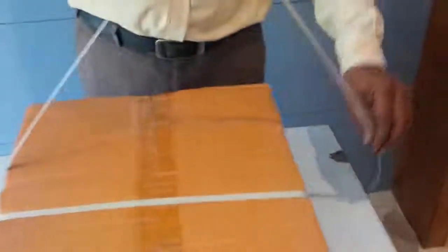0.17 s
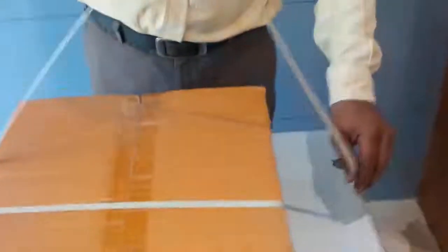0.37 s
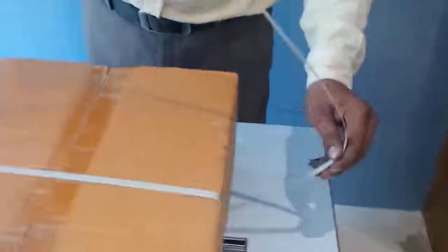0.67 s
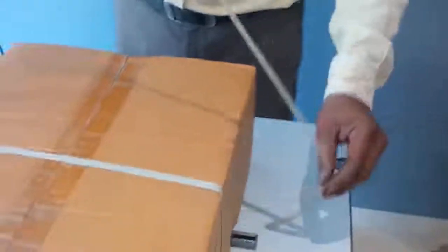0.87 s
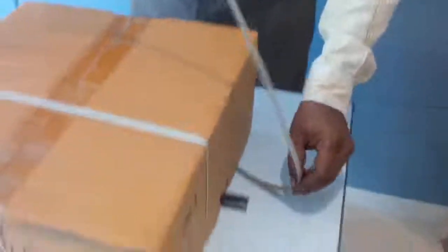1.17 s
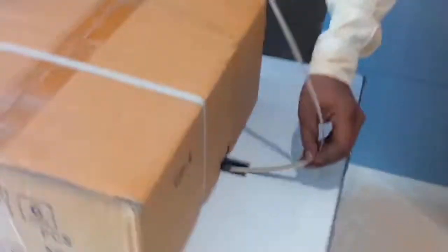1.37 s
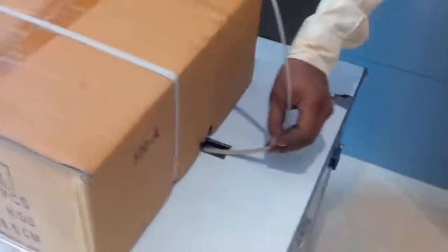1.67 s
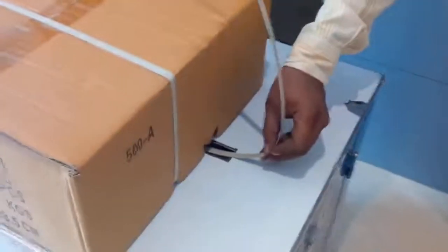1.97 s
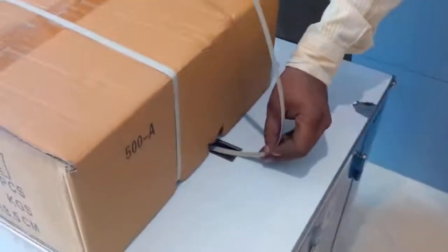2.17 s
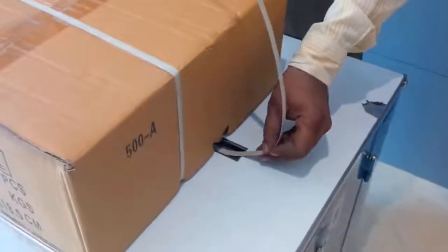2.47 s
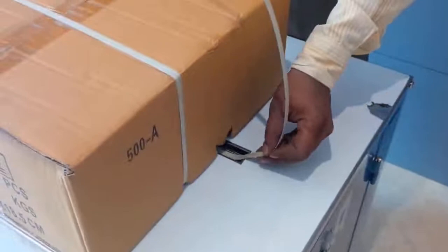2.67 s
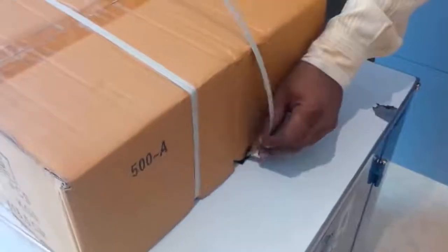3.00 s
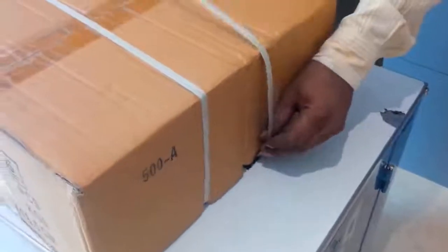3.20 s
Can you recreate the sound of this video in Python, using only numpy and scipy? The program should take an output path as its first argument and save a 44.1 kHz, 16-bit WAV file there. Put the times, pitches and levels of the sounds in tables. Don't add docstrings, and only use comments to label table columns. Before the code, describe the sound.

A strapping machine hums low and steady, with a wavering mains buzz. At 0.74 s a metallic click and cabinet thud start light gear clatter, with a faint tick near 1.05. From 1.65 to 2.1 s come dense clanks, carton knocks and strap rustle. Softer knocks follow at 2.3 and 2.7. The loudest clanks, thud and strap slaps hit at 2.95-3.2 s, clatter continuing to the end; hard-room echo.

```python
import sys
import numpy as np
from scipy import signal
from scipy.fft import rfft, irfft, next_fast_len
from scipy.io import wavfile
from scipy.ndimage import uniform_filter1d

SR = 44100
rng = np.random.default_rng(int(sys.argv[2]) if len(sys.argv) > 2 else 0)


def volts_from_db(level):
    exponent = np.asarray(level, float) / 20
    return 10 ** exponent


def pcm_store(signal):
    levels = np.round(np.clip(np.atleast_2d(signal), -1, 1) * 32767)
    wavfile.write(sys.argv[1], SR, levels.astype(np.int16).T)


N = 147294

# [f/Hz, level/dB]
MOTOR_COLOUR = [(20, -23), (70, -3.5), (140, -5.5), (400, -5.5), (520, -10), (2500, -24.5), (6100, -36),
                (9800, -64), (13000, -67)]
# [f/Hz, width/Hz, level/dB]
CABINET_DRONE = [(52.8, 2.7, -13), (103.5, 25, -12.5), (143.25, 4.1, -3), (174, 18, -19), (266.7, 48, -8),
                 (301, 68, -14.5), (404.5, 47, -14.5)]
# [t/s, level/dB]
PANEL_SHAKE = [(0, -33.5), (.69, -33.5), (.88, -22), (1.01, -33.5), (1.18, -37), (1.53, -38.5),
               (1.79, -22.5), (2.2, -60), (2.35, -33), (2.68, -24), (2.78, -35), (3.11, -30), (3.34, -29)]
# [t/s, level/dB]
MAINS_BUZZ = [(0, -29), (.3, -30), (.6, -30.5), (.9, -29), (1.35, -26), (1.5, -36), (1.63, -23.5),
              (1.8, -27), (2.1, -35), (2.5, -44), (2.85, -33), (3.2, -22.5), (3.34, -32)]
# [t/s, level/dB]
HAND_RUMBLE = [(0, -39), (.78, -54), (1.19, -35), (1.8, -30.5), (1.9, -40), (3.34, -39)]
# [t/s, level/dB]
GEAR_LOAD = [(0, -56), (.72, -58), (.75, -31.5), (.86, -36), (.9, -31.5), (1.63, -36.5), (1.68, -29.5),
             (1.8, -23), (1.98, -28.5), (2.15, -26.5), (2.3, -52), (2.35, -32.5), (2.66, -43.5),
             (2.69, -25.5), (2.92, -35.5), (2.96, -19.5), (3.25, -21.5), (3.34, -27.5)]
# [f/Hz, level/dB]
GEAR_COLOUR = [(40, -15), (100, -38), (260, 0), (450, -5.5), (800, -4), (2000, -12), (4500, -19),
               (9000, -40)]
# [t/s, level/dB]
STRAP_SLIDE = [(0, -47.5), (.03, -63), (.72, -83), (.75, -47), (.87, -70), (.95, -49.5), (1.64, -43),
               (1.68, -32.5), (1.8, -35.5), (2.03, -38.5), (2.09, -41), (2.26, -52), (2.33, -46),
               (2.78, -46.5), (2.91, -60), (2.99, -31.5), (3.2, -29.5), (3.34, -42)]
# [f/Hz, level/dB]
STRAP_COLOUR = [(1000, 7.5), (3000, -12), (6000, 3.5), (10000, -3), (14000, -5.5), (17000, -9)]
# [t/s, level/dB]
STRAP_CRISPNESS = [(0, -1), (.8, 0), (.88, -7), (1.05, 2), (1.6, -2), (1.98, -8), (2.03, -17), (2.1, -3),
                   (2.25, -14), (2.31, 6), (2.7, 1), (2.77, -14), (2.97, -10), (3.0, 3), (3.34, -10)]
# [t/s, level/dB, f/Hz, length/s]
STEEL_CLANKS = [(.737, -29.5, 2600, 0.012), (.883, -29.5, 2520, 0.012), (1.048, -29, 2690, 0.022),
                (1.646, -18, 2700, 0.0034), (1.722, -23, 2360, 0.014), (1.772, -22, 2690, 0.011),
                (1.897, -24.5, 2280, 0.026), (2.05, -16.5, 2960, 0.026), (2.085, -29, 3530, 0.093),
                (2.322, -28, 3500, 0.0098), (2.671, -29, 2970, 0.021), (2.941, -10, 3550, 0.016),
                (2.99, -15, 3300, 0.012), (3.01, -12, 2160, 0.0041), (3.065, -23, 2680, 0.04),
                (3.16, -18.5, 3040, 0.028)]
# [t/s, level/dB, f/Hz, length/s]
CARTON_KNOCKS = [(1.052, -22.5, 710, 0.022), (1.647, -18.5, 1540, 0.0068), (1.655, -17.5, 650, 0.008),
                 (1.725, -24.5, 830, 0.016), (1.772, -23.5, 920, 0.011), (1.9, -18, 660, 0.0204),
                 (2.053, -21.5, 1160, 0.01555), (2.322, -32, 1050, 0.019), (2.33, -28, 670, 0.0349),
                 (2.94, -24, 580, 0.021), (3.01, -15, 850, 0.01), (3.065, -18, 835, 0.015)]
# [t/s, level/dB, f/Hz, length/s]
CARTON_HOLLOWS = [(1.054, -35, 656, 0.033), (1.657, -34, 730, 0.021), (1.766, -24.5, 900, .014),
                  (1.775, -21.5, 399, .014), (1.83, -22, 265, 0.026), (1.9, -28.5, 1220, 0.0212),
                  (1.945, -28.5, 403, 0.012), (1.975, -24.5, 140, 0.051), (2.325, -32, 1120, .025),
                  (2.36, -32.5, 280, 0.049), (2.52, -29, 268, 0.034), (2.56, -32, 143, 0.0545),
                  (2.74, -25.5, 290, 0.029), (2.945, -25, 544, 0.02)]
# [t/s, level/dB, f/Hz, length/s]
CABINET_THUDS = [(.745, -16.5, 318, 0.013), (.775, -14, 293.3, 0.018), (1.65, -13, 265, 0.0084),
                 (1.725, -22, 200, 0.029), (1.77, -15.5, 267, 0.0245), (1.79, -18.5, 140, 0.0425),
                 (1.91, -17, 276, 0.028), (2.675, -17.5, 260, 0.0315), (2.95, -23, 420, 0.0518),
                 (3.008, -7, 254, 0.01), (3.06, -16.5, 284, 0.0254), (3.115, -19.5, 259, 0.021)]
# [t/s, level/dB, f/Hz, length/s]
STRAP_SLAPS = [(.737, -43, 9000, 0.0091), (.948, -44, 8900, 0.017), (1.048, -40, 8000, 0.024),
               (1.616, -38, 11000, .004), (1.646, -30, 9000, 0.0033), (1.662, -25, 8000, 0.0032),
               (1.724, -29.5, 9900, 0.011), (1.86, -37, 10800, 0.023), (1.953, -36, 8700, 0.0046),
               (2.06, -41, 7900, .025), (2.32, -35, 12000, 0.014), (2.943, -34, 7500, 0.023),
               (2.668, -43.5, 7950, 0.034), (2.985, -28, 7760, 0.019), (3.011, -24.5, 7900, 0.0051),
               (3.158, -23.5, 8800, .015)]
# [t/s, level/dB, f/Hz, length/s]
STEEL_PINGS = [
    (.74, -30.5, 1130, 0.0393),
    (.742, -36, 2960, 0.0105),
    (1.052, -40, 4050, 0.019),
    (1.645, -34, 5140, 0.0044),
    (2.323, -39.5, 4000, .015),
    (2.676, -34.5, 3080, .025),
    (2.944, -21, 3950, .012),
]
# [t/s, level/dB, f/Hz, length/s]
CONTACT_TICKS = [(.738, -26, 1800, 0.0031), (1.6455, -16.5, 2960, 0.0016), (1.663, -18, 11000, 0.0014),
                 (1.7255, -24.5, 2200, 0.0016), (1.737, -25, 3000, 0.0021), (2.058, -24, 3360, 0.0043),
                 (2.323, -25.5, 1260, 0.0031), (2.944, -27, 4200, 0.0031), (2.9987, -24, 3300, 0.0024),
                 (3.011, -11, 5030, .0015), (3.045, -20, 3000, 0.0016), (3.081, -14, 3030, 0.0013),
                 (3.1, -17, 3500, 0.0018), (3.122, -20, 2940, 0.0022), (3.215, -20.5, 4030, 0.003)]
# [f/Hz, level/dB, time to fade 60 dB/s]
STEEL_NOTES = [(1125, 0.5, 0.078), (1185, -8, 0.056), (2040, -14, 0.007), (2140, -6, 0.14),
               (3025, -14, 0.067), (3300, 0, 0.059), (4070, -11, 0.085), (5280, -4, 0.048)]
# [f/Hz, level/dB, time to fade 60 dB/s]
PANEL_NOTES = [(140, 10.5, 0.16), (245, 1, 0.098), (265, 1, 0.22), (292, -5.5, 0.1), (396, 1, 0.076),
               (645, -4, 0.093), (772, -8, 0.035)]
# [f/Hz, level/dB]
FAINT_LIMIT = [(6000, -110), (9000, -88.5), (11000, -78.5), (13000, -76.5), (15000, -74.5), (16000, -62),
               (16300, -18)]


def noise(size=N):
    return rng.standard_normal(size)


def level(x, db):
    return x * volts_from_db(db) / np.sqrt(np.mean(x ** 2))


def colour(x, points):
    hz, db = np.array(points, float).T
    size = next_fast_len(N, True)
    f = np.maximum(np.fft.rfftfreq(size, 1 / SR), 1)
    gain = volts_from_db(np.interp(np.log(f), np.log(hz), db))
    return irfft(rfft(x, size) * gain, size)[..., :N]


def curve(points):
    s, db = np.array(points, float).T
    return volts_from_db(np.interp(np.arange(N) / SR, s, db))


def ring(x, hz, width_hz):
    return signal.lfilter(*signal.iirpeak(hz, hz / width_hz, fs=SR), x)


def walk(rate_hz):
    k = int(SR / rate_hz)
    steps = np.repeat(noise(N // k + 1), k)
    return 1.86 * uniform_filter1d(uniform_filter1d(steps, k), k)[:N]


def room():
    t = np.arange(SR // 2) / SR
    t60_s, treble_t60_s, predelay_s = 0.95, 0.6, 0.0024
    low = signal.lfilter(*signal.butter(N=1, Wn=1500, fs=SR), noise(len(t)))
    high = signal.lfilter(*signal.butter(N=1, Wn=1500, btype="high", fs=SR), noise(len(t)))
    tail = low * volts_from_db(-60 * t / t60_s) + high * volts_from_db(-60 * t / treble_t60_s)
    tail = tail * (t > predelay_s)
    return tail / np.sqrt(np.sum(tail ** 2))


def echo(hits, thuds):
    return volts_from_db(-1.5) * signal.fftconvolve(hits + volts_from_db(-3.5) * thuds, room())[:N]


def hand():
    return level(ring(ring(noise((2, N)), 42, 30), 42, 30), -4.0) * curve(HAND_RUMBLE)


def motor():
    motor_db, mains_hz, mains_db = -27.5, 99.46, -32
    wide = level(colour(noise((2, N)), MOTOR_COLOUR), -4.5) * volts_from_db(1.9 * walk(7.44))
    drones = [level(ring(noise((2, N)), hz, width), db) * volts_from_db(0.5 * walk(3.68))
              for hz, width, db in CABINET_DRONE]
    phase = 2 * np.pi * mains_hz * np.arange(N) / SR + 0.37 * walk(1.34)
    hum = volts_from_db(mains_db) * np.sin(phase) * np.array([[1], [0]])
    steady = volts_from_db(motor_db) * (wide + sum(drones[3:]) + drones[0])
    shaken = volts_from_db(3) * curve(PANEL_SHAKE) * drones[2]
    buzz = volts_from_db(2.5) * curve(MAINS_BUZZ) * (drones[1] + hum / volts_from_db(motor_db))
    return steady + shaken + buzz


def gears():
    grit = volts_from_db(1.3 * np.minimum(rng.exponential(size=N), 5))
    teeth = colour(noise((2, N)) * grit, GEAR_COLOUR)
    ringing = sum(volts_from_db(db) * ring(teeth, hz, 2.26 / t60) for hz, db, t60 in PANEL_NOTES + STEEL_NOTES)
    teeth = teeth + volts_from_db(3.5) * ringing
    return level(teeth, 0) * curve(GEAR_LOAD) * volts_from_db(np.tanh(walk(39.9)))


def strap():
    grit = volts_from_db(1.2 * np.minimum(rng.exponential(size=N), 4))
    grain = level(colour(noise((2, N)) * grit, STRAP_COLOUR), 1)
    crisp_hz = 11800
    top = colour(grain, [(.94 * crisp_hz, -80), (crisp_hz, 0), (20000, 0)])
    rustle = grain + (curve(STRAP_CRISPNESS) - 1) * top
    return rustle * curve(STRAP_SLIDE) * volts_from_db(1.6 * walk(42))


def bursts(table, spread, grit_db, notes, ring_db):
    size = SR // 6
    t = np.arange(size) / SR
    out = np.zeros(N + size)
    chance = noise((len(table), size))
    grit = rng.exponential(size=(len(table), size))
    for (s, db, hz, length), c, g in zip(table, chance, grit):
        attack = 1 - np.exp(-t / (0.26 * length))
        shape = attack * np.exp(-(t / length) ** 1.19)
        rattle = c * volts_from_db(grit_db * np.minimum(g, 4)) * shape
        hit = ring(ring(rattle, hz, spread * hz), hz, spread * hz)
        i = int((s - .12 * length) * SR)
        out[i:i + size] += hit * volts_from_db(db) / np.sqrt(np.sum(hit ** 2) / (length * SR))
    out = out[:N]
    ringing = sum(volts_from_db(db) * ring(out, hz, np.log(1000) / (np.pi * t60)) for hz, db, t60 in notes)
    return out + volts_from_db(ring_db) * ringing


def cabinet_thuds():
    return volts_from_db(-5.0) * bursts(CABINET_THUDS, 0.27, 1.0, PANEL_NOTES, -7.0)


def carton():
    knocks = bursts(CARTON_KNOCKS, 0.98, 1.26, PANEL_NOTES[3:] + STEEL_NOTES[1:2], 0.7)
    return volts_from_db(-2) * knocks + bursts(CARTON_HOLLOWS, 0.19, 1.9, PANEL_NOTES[2:], -18)


def strap_slaps():
    return volts_from_db(-0.5) * bursts(STRAP_SLAPS, 1.04, 9.1, STEEL_NOTES[-1:], -7)


def steel_parts():
    dull = signal.butter(N=6, Wn=5940, fs=SR, output="sos")
    clanks = signal.sosfilt(dull, bursts(STEEL_CLANKS, 1.0, 2.4, STEEL_NOTES, 5.2))
    pings = bursts(STEEL_PINGS, 0.073, 0.86, STEEL_NOTES[4:6], -8)
    ticks = bursts(CONTACT_TICKS, 1.0, 3.3, STEEL_NOTES, -13)
    return volts_from_db(-5.5) * clanks + pings + ticks


def scene():
    steady = hand() + motor() + gears() + strap()
    thuds = cabinet_thuds()
    hits = carton() + strap_slaps() + steel_parts()
    size = SR // 25
    scatter = noise(size) * np.exp(-np.arange(size) / SR / 0.0025)
    scatter = scatter / np.sqrt(np.sum(scatter ** 2))
    other = steady[1] + signal.oaconvolve(hits + thuds, scatter)[:N]
    side = colour(other + echo(hits, thuds), [(30, -5), (80, -26), (600, -14), (1400, -0.5), (20000, -0.5)])
    mid = steady[0] + hits + thuds + echo(hits, thuds)
    return np.array([mid + side, mid - side])


def top_cut(x):
    return signal.sosfilt(signal.butter(12, 16330, fs=SR, output="sos"), x)


def record(dry):
    rounded = np.tanh(.5 * dry) / .5
    f, _, z = signal.stft(rounded, SR, nperseg=1024)
    bands = np.mean(abs(z) ** 2, axis=0).reshape(19, 27, -1).mean(axis=1)
    bands = bands * volts_from_db(uniform_filter1d(7 * noise(bands.shape), size=3, axis=1))
    power = uniform_filter1d(np.repeat(bands, 27, axis=0), size=2, axis=1)
    hz, db = np.array(FAINT_LIMIT, float).T
    limit = volts_from_db(np.interp(f, hz, db, left=-200))[:, None] ** 2
    heard = signal.istft(z * (power > limit), SR, nperseg=1024)[1]
    return top_cut(heard[:, :N])


dry = scene()
out = record(dry)
pcm_store(out)
```